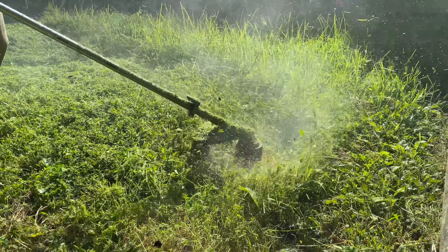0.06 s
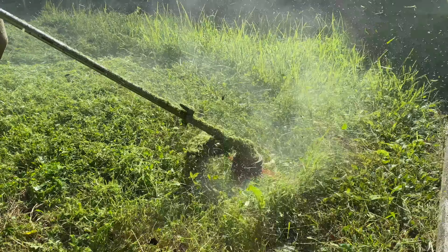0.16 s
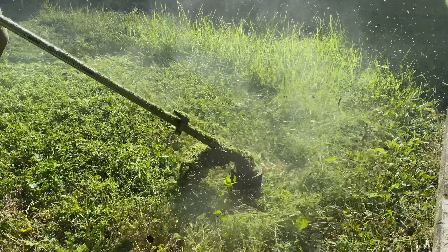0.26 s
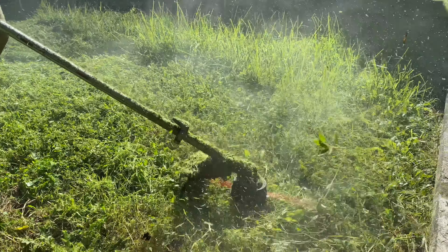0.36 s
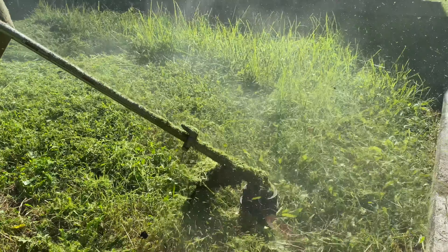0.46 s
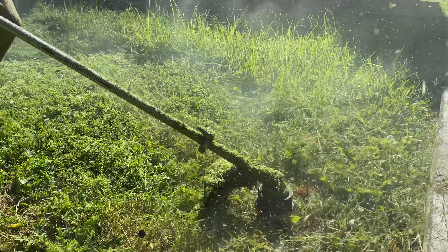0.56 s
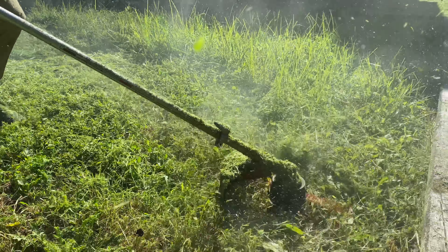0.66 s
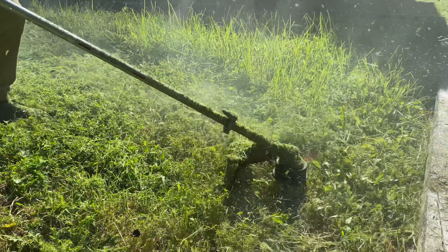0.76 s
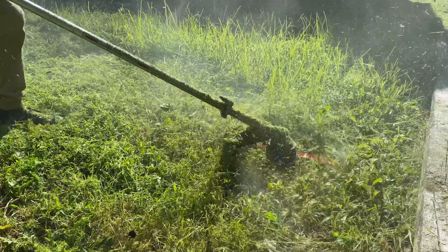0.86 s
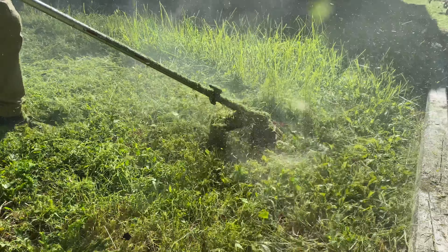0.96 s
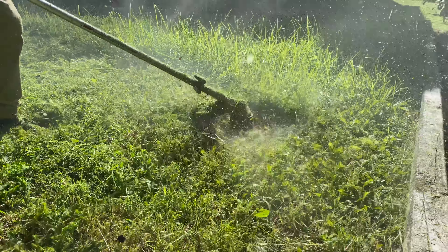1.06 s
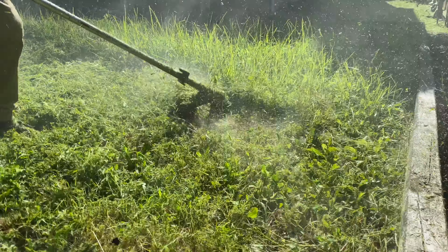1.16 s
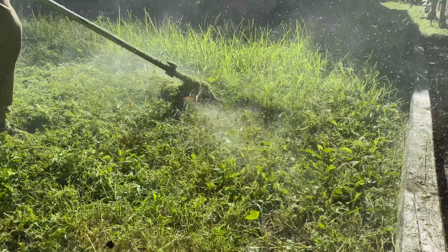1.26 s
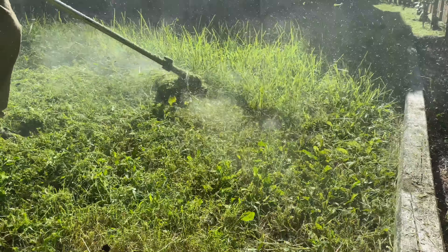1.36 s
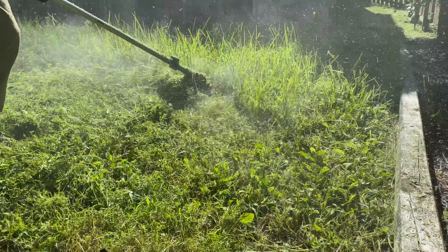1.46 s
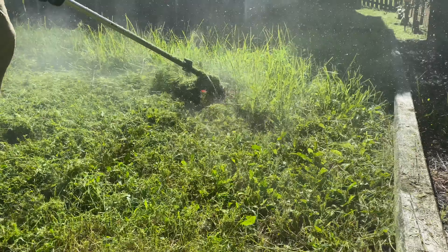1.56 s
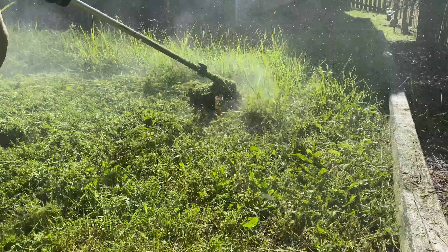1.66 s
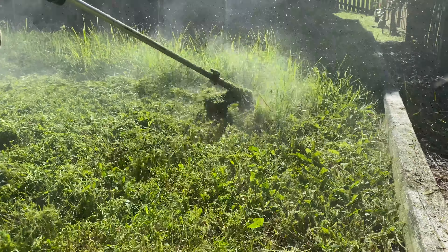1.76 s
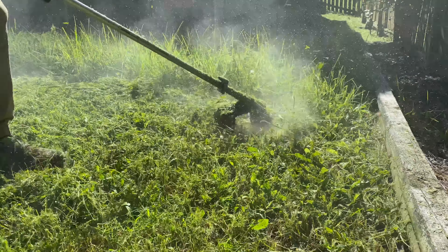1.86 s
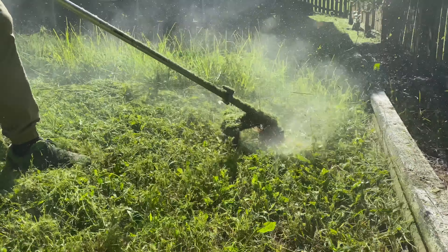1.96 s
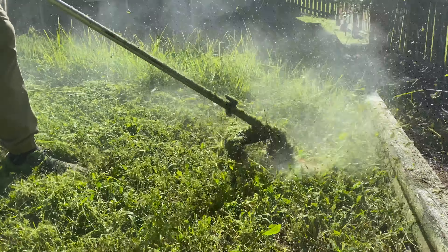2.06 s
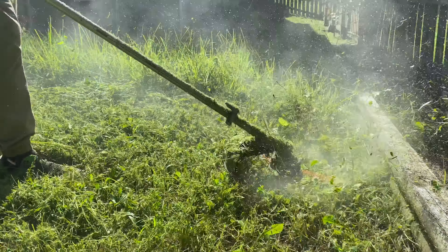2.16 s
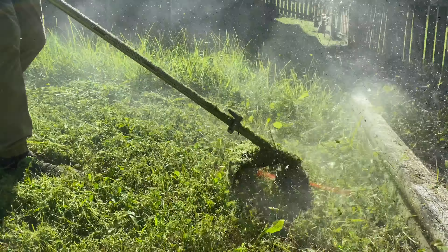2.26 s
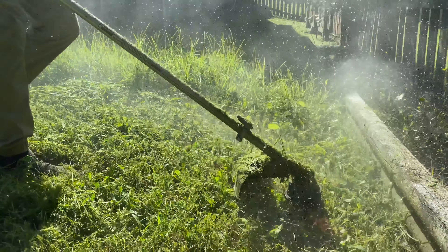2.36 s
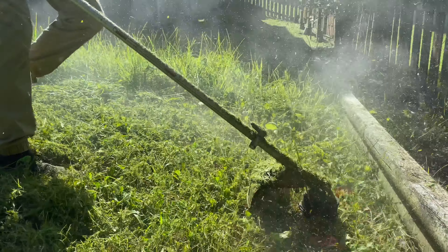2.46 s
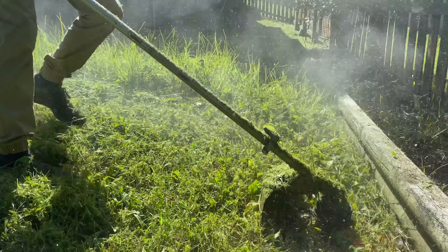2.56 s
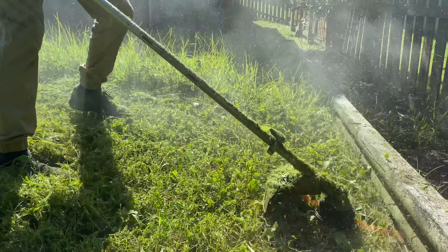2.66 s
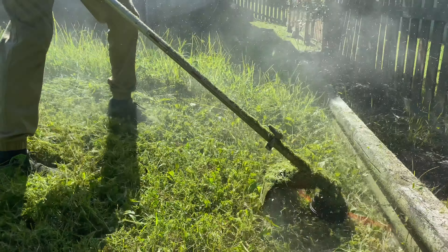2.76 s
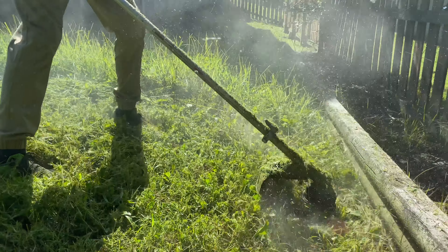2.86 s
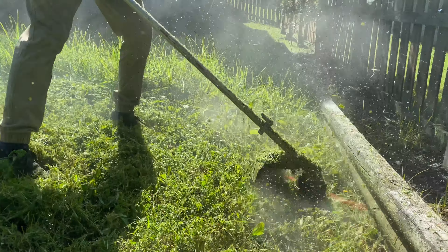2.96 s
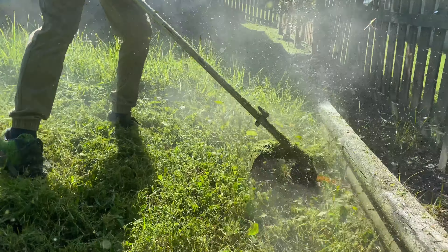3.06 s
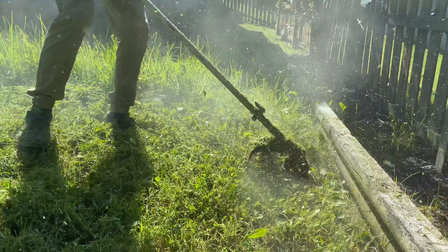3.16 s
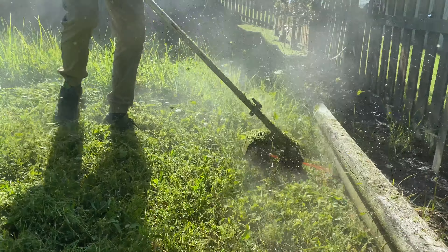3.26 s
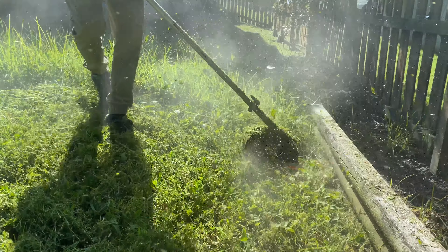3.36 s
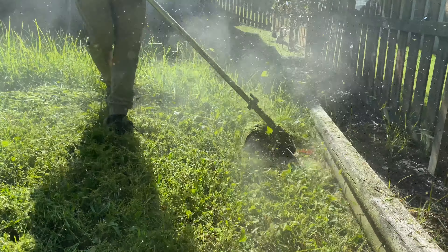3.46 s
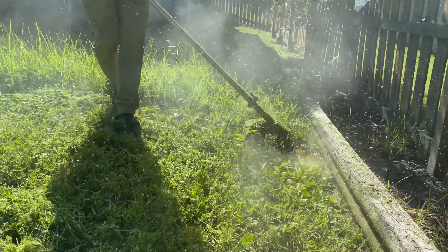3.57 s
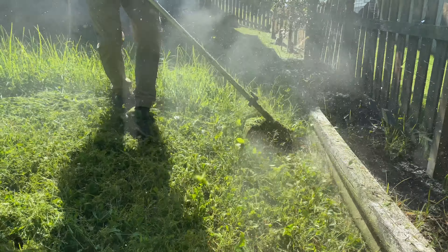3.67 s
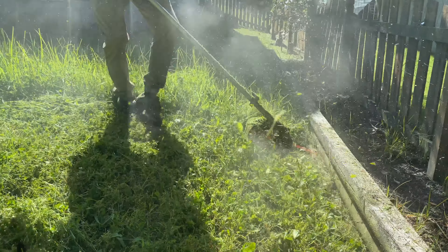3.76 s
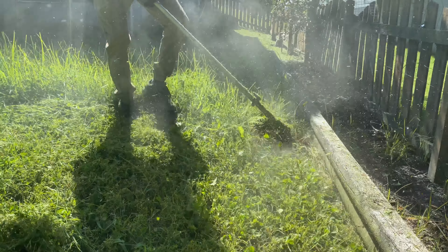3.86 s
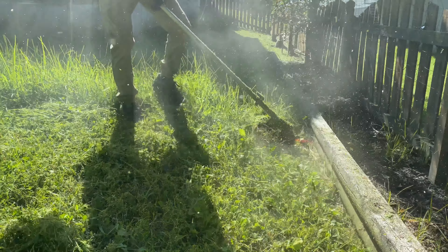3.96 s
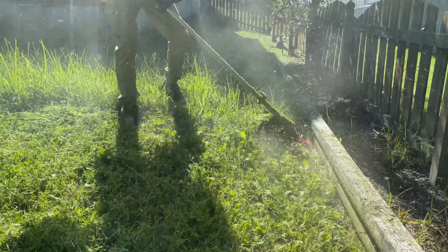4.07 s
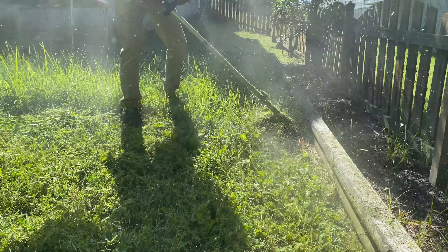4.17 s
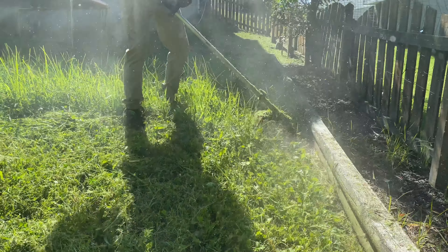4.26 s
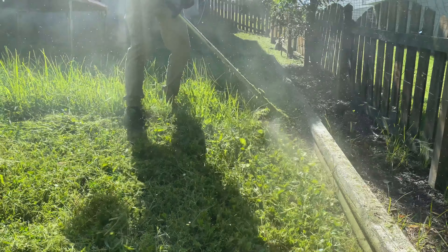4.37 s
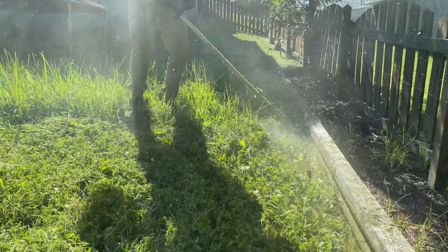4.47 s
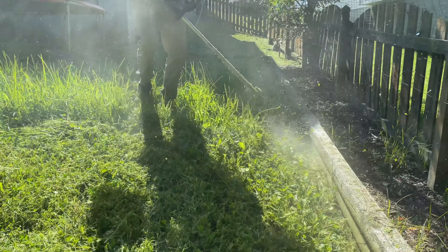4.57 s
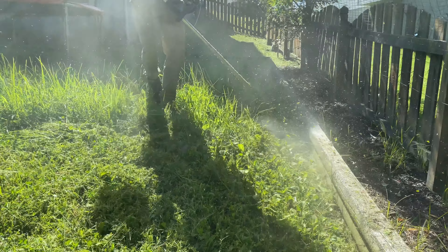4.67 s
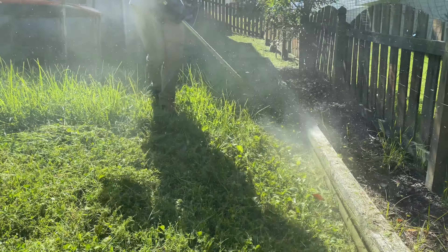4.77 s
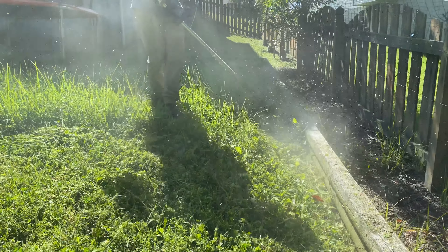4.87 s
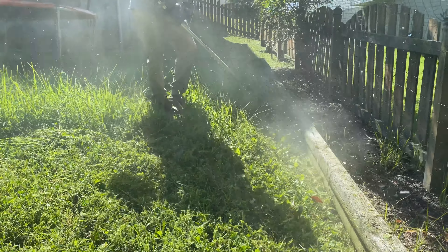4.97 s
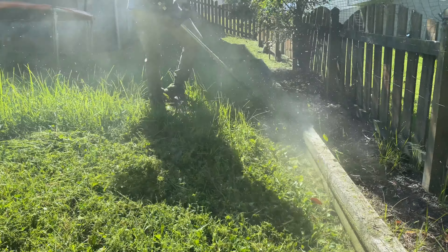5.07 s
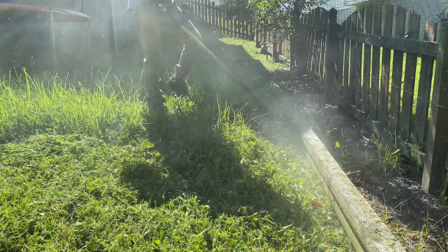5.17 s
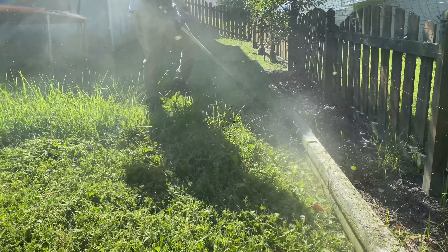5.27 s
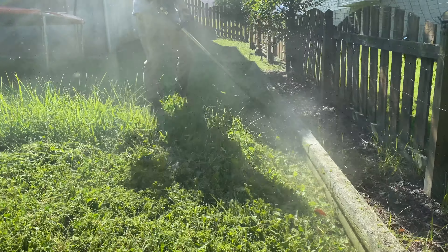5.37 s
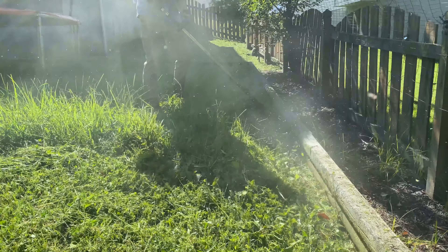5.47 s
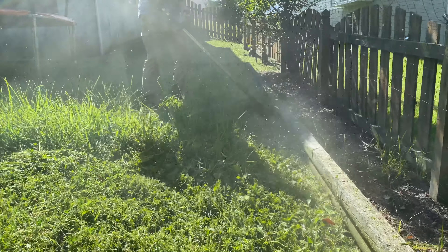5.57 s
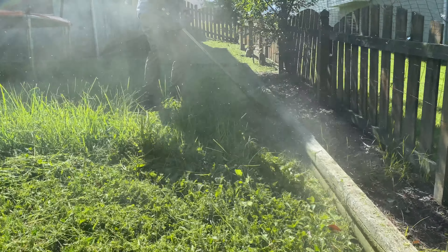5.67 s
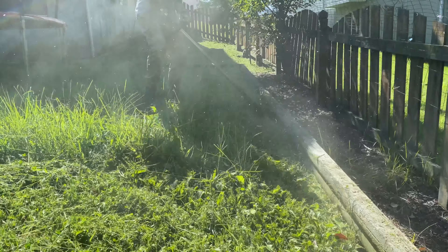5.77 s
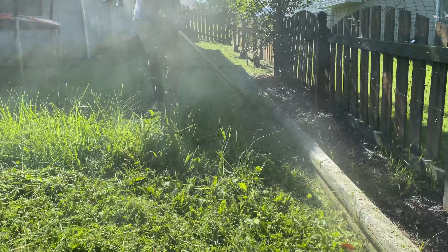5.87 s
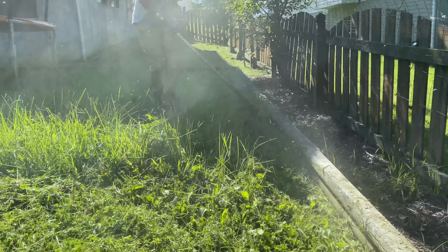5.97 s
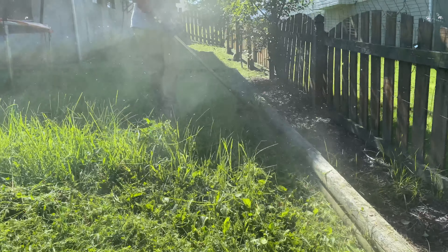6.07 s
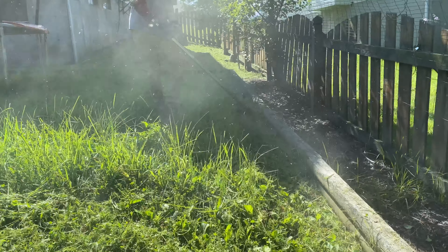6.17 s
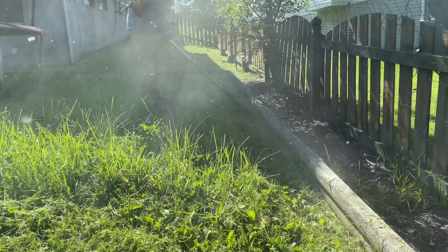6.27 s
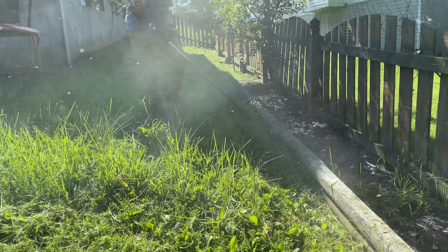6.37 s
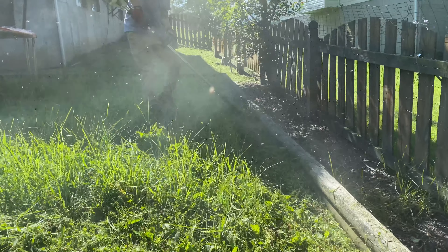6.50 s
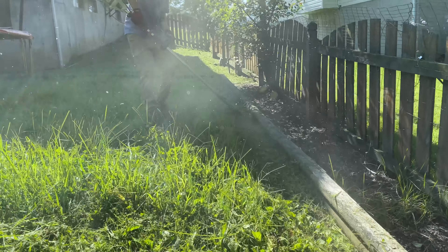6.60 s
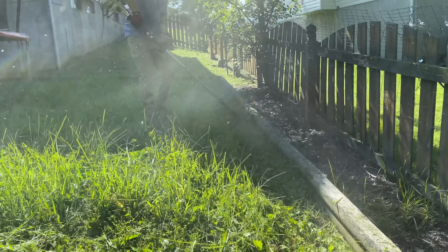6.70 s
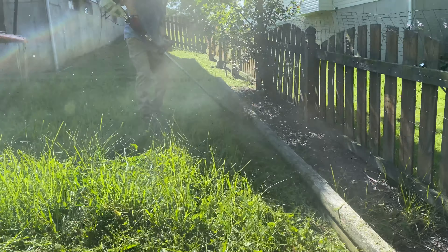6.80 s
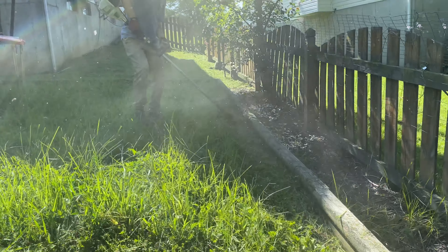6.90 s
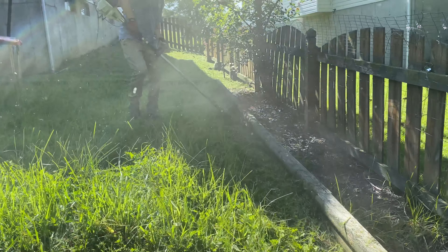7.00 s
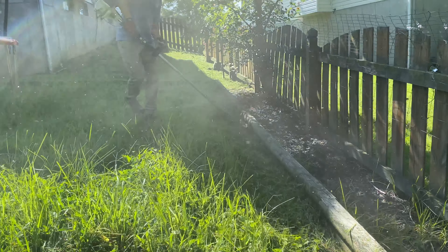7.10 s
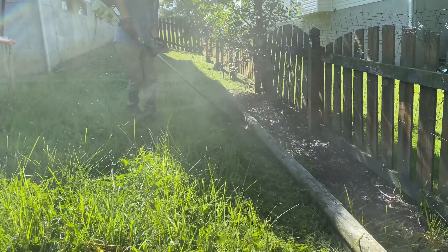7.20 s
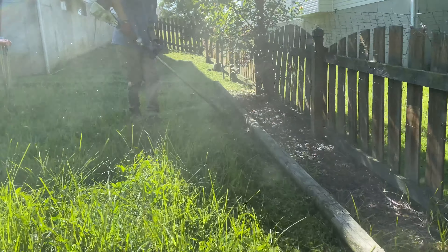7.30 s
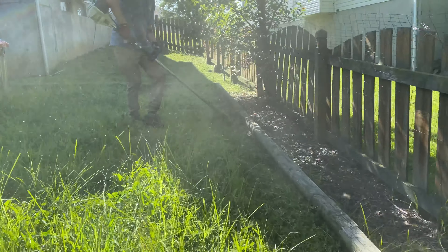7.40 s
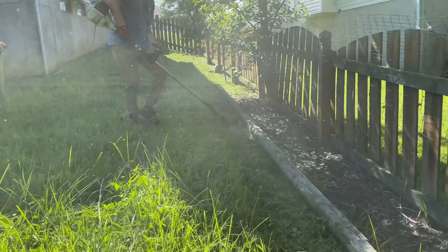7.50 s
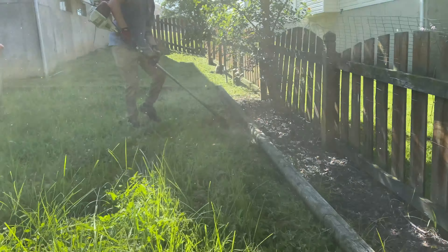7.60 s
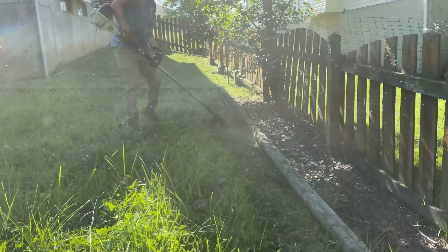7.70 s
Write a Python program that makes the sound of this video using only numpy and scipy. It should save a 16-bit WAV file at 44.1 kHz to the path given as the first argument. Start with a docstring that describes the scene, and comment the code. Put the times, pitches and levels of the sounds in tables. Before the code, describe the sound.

A small engine buzzes continuously at high revs, with a low drone around 75 hertz and a dense raspy buzz above. The spinning line whirs and tears tall grass in a fluttering, crackling hiss, with sharp twig cracks and a few dull thumps on the microphone early on. The revs dip before one and a half seconds, then recover. Cutting recedes along the yard, with a brief faint whistle late; a steady low hum lies underneath.

```python
"""In a yard, a petrol string trimmer runs near full throttle as its operator mows tall grass and walks away.
The exhaust drones as a stack of tones locked to the firings; the geared-down line whirs as tones locked to its turns.
Shredded stems and flung air are shaped noise, the casing clatters in a burst per firing, and twigs snap in brief cracks.
Debris knocks the microphone with falling tones, the line whistles once late on, and a steady hum lies underneath.
Two closely spaced microphone ports hear it all."""
import sys
import numpy as np
from scipy import signal
from scipy.fft import rfft, irfft
from scipy.io import wavfile
from scipy.ndimage import uniform_filter1d

SR = 44100
rng = np.random.default_rng(int(sys.argv[2]) if len(sys.argv) > 2 else 0)


def wrap_up_sound(samples):
    """Save the sound to the file named by the first command line argument, as 16-bit audio."""
    columns = np.atleast_2d(samples).T
    # keep every value between -1 and 1, then stretch to whole-number steps
    tamed = np.clip(columns, -1, 1)
    steps = np.round(tamed * 32767).astype(np.int16)
    wavfile.write(sys.argv[1], SR, steps)


N = 341334   # length in samples
TIME = np.arange(N) / SR   # s
BINS_HZ = np.maximum(np.arange(N // 2 + 1) * SR / N, 1)

# engine speed, with sags for thick grass: [t/s, firings per s]
ENGINE_SPEED = [(0.0, 72.6), (0.06, 72.3), (0.43, 76.1), (1.07, 75.1), (1.2, 73.6), (1.25, 71.9),
                (1.32, 70.8), (1.46, 70.0), (1.75, 74.5), (2.31, 73.4), (2.46, 76.1), (2.72, 78.2),
                (2.99, 74.3), (3.54, 75.8), (3.77, 75.0), (4.2, 76.3), (4.57, 74.5), (5.09, 75.5),
                (5.93, 73.8), (6.03, 75.2), (6.34, 76.2), (6.9, 74.5), (7.03, 73.0), (7.2, 75.8),
                (7.5, 77.2), (7.74, 76.2)]
# walking away: [t/s, place (0 near, 1 midway, 2 far)]
WALK = [(0, 0.0), (1.3, 0.27), (1.8, 0.2), (2.3, 0.78), (3.0, 1.08), (4.3, 1.2), (5.1, 1.65), (6.2, 1.73),
        (7.74, 2.0)]
# exhaust tones, before the trim and the changes below: [multiple of firing rate, level near/dB, midway/dB, far/dB]
EXHAUST_TONES = [(1, -38.8, -39.8, -40.2), (2, -36.5, -38, -34.6), (3, -52, -54, -53),
                 (4, -38.7, -40.5, -51.5), (5, -39.3, -42.7, -45.7), (6, -44.5, -44, -40),
                 (7, -46.5, -38.6, -42.7), (8, -42, -42.6, -40.3), (9, -48.5, -50.5, -46.3),
                 (10, -45, -52.5, -47.5), (11, -45, -45.7, -51), (12, -61, -60, -58), (13, -51, -43, -52),
                 (14, -54, -51.5, -52.5), (15, -59, -60, -57), (16, -57, -57, -51.5), (17, -59, -62, -56),
                 (23, -62, -61, -60), (28, -60, -61, -63), (33, -57, -58, -54), (35, -61, -62, -61),
                 (38, -56, -55, -56), (42, -58, -61, -62), (47, -59, -62, -65)]
# change in the exhaust's upper tones as the operator turns: [t/s, level/dB]
BARK = [(0, -1.5), (0.8, 1.5), (1.1, 1.5), (1.35, -1), (1.75, 2.5), (2.2, -0.5), (2.45, -1), (2.8, 0),
        (3.4, 0.5), (5.2, 0.5), (5.9, -0.5), (6.35, 0.5), (7.05, -0.5), (7.3, 1), (7.74, 2)]
# exhaust at the two ports: [f/Hz, left minus right level/dB]
EXHAUST_PAN = [(150, 0), (300, .8), (550, 3.3), (900, 5.5), (1500, 7), (2000, -2), (2500, -2), (2900, 2),
               (4500, 0)]
# tones of the two strands, relative to WHIR_LEVEL: [multiple of head turns, level near/dB, level from midway on/dB]
WHIR_TONES = [(2, -1.5, -2), (4, -7, -12), (6, -15.5, -13), (8, -22, -16)]
# whir of the free-running line, loudest as the head swings close: [t/s, level/dB]
WHIR_LEVEL = [(0, -33.5), (1.3, -35.5), (2.2, -31.5), (2.9, -35), (4.3, -38), (7.74, -39)]
# steady hum: [multiple of HUM_HZ, level/dB]
HUM_TONES = [(2, -41.5), (3, -48), (4, -50.5), (5, -42.5), (6, -48), (8, -53.5)]
# tone of the engine casing: [f/Hz, relative level per Hz near/dB, relative level per Hz far/dB]
CASING_COLOUR = [(700, -8, -8), (1200, -13, -11.5), (1800, -15, -14), (2250, -3, -6), (2480, 1, 5.5),
                 (2660, -3, -4), (2850, 0, 5.5), (3080, -1, -3), (3500, 3, -5), (3900, 3, -6),
                 (4600, 1.5, 3.5), (5400, 1.5, 4.5), (7000, -1, -1), (15000, -24, -24)]
# clatter of the casing, plainest when the engine faces the microphone: [t/s, level/dB]
CLATTER = [(0, -39), (0.95, -38.5), (1.3, -38.5), (1.7, -33.5), (2.1, -36), (2.5, -51), (3.3, -39.5),
           (4.2, -42.5), (4.6, -43), (5.3, -39.5), (5.55, -48), (6.1, -46), (6.3, -40.5), (6.9, -43),
           (7.1, -42), (7.5, -42.5), (7.74, -36)]
# the cut, which shredding and clipped blades follow at offsets of their own: [t/s, level/dB]
CUT = [(0.0, -30.5), (0.43, -25.5), (0.73, -24), (1.33, -36), (2.55, -26.5), (2.72, -26.5), (4.22, -35),
       (4.72, -35), (6.21, -37.5), (6.62, -34.5), (6.77, -36.5), (6.94, -32.5), (7.09, -36), (7.74, -32)]
# tone of the shredding: [f/Hz, relative level per Hz/dB]
SHRED_COLOUR = [(1000, -29), (2700, -21), (4000, -6), (5500, -1.5), (6700, 2), (7500, 3.5), (9500, 2.5),
                (12000, 0), (14000, 0.5), (15800, -4)]
# tearing of thick stems, which eases where the line only skims the tips: [t/s, level/dB]
TEARING = [(0, -31), (0.42, -32), (0.55, -32.5), (0.75, -29.5), (1.0, -32.5), (1.35, -36), (1.55, -37),
           (1.9, -33), (2.2, -31.5), (2.5, -33), (2.65, -33), (2.8, -30.5), (3.0, -30), (3.35, -34),
           (4.2, -36.3), (4.7, -33.5), (5.3, -35.5), (5.55, -36), (6.1, -35.5), (6.45, -34.5), (7.1, -37.5),
           (7.74, -35)]
# tone of the tearing: [f/Hz, relative level per Hz/dB]
TEAR_COLOUR = [(300, -20), (900, -7), (1400, -4.2), (2000, -.9), (3000, -1.6), (5000, -1.8), (7000, -3),
               (15000, -14)]
# tone of the flung air and clippings: [f/Hz, relative level per Hz/dB]
RUSH_COLOUR = [(20, -34), (40, -31), (70, -2), (120, 3), (200, 3.5), (400, 6), (650, 3), (950, 3.5),
               (1500, -5), (3000, -58)]
# the rush at the two ports: [f/Hz, left minus right level/dB]
RUSH_PAN = [(150, 0), (350, 1), (700, 3), (1400, 4), (2500, 3)]
# tone of single clipped blades: [f/Hz, relative level per Hz/dB]
BLADE_COLOUR = [(3000, -28), (6000, -14), (9500, -11), (11000, 0), (12500, 4), (14000, 1), (15800, -10)]
# snapping twigs and thick stems: [t/s, energy before the trim in scene()/dB, lowest f/Hz, highest f/Hz]
SNAPS = [(0.031, -6, 1500, 6000), (0.0565, -6, 1000, 5000), (0.0687, -2, 10000, 15000),
         (0.0767, -2, 600, 7000), (0.1135, -6, 1000, 5000), (0.1418, -2, 10000, 15000),
         (0.185, -1, 2500, 7000), (0.1943, 2, 3200, 5600), (0.3013, -1, 10000, 15000),
         (0.333, -2, 10000, 15000), (0.4252, 3.5, 800, 9000), (0.4502, 6, 11500, 14500),
         (0.5058, 1, 11000, 15000), (0.5798, 1, 10000, 14000), (0.5886, 1, 11000, 14000),
         (0.6626, 2, 10500, 14000), (0.7742, 0, 10000, 15000), (0.818, 0, 2000, 7000),
         (0.9456, -2, 3000, 9000), (1.0842, -6, 2000, 7000), (1.184, -2, 2200, 7500),
         (1.6265, -2, 3000, 7000), (1.862, -5, 2000, 7000), (1.9292, -6, 2500, 7000),
         (2.0088, -2, 10000, 15000), (2.044, -6, 2500, 7000), (2.2216, -3, 3000, 10000),
         (2.227, -5, 3000, 7000), (2.3659, 1, 10000, 15000), (2.6761, 0, 10000, 15000),
         (2.7683, -2, 2000, 15000), (2.8002, 7, 500, 15000), (2.9611, 2, 5000, 15000),
         (2.963, -4, 1200, 5000), (3.0502, 2, 4000, 15000), (3.2602, -2, 3000, 12000),
         (3.5512, -5, 3000, 14000), (3.8485, -4, 10000, 15000), (4.7845, -7, 3000, 13000),
         (5.3765, -5, 2500, 8000), (5.785, -7, 3000, 14000), (5.867, -8, 10000, 15000),
         (6.618, -8, 2500, 7000), (6.9374, -4, 9000, 15000), (7.0057, -5, 10000, 15000),
         (7.3834, -7, 10000, 15000), (7.509, -2, 3500, 15000)]
# debris and puffs on the microphone: [t/s, starting level of the knock/dB, first f/Hz, last f/Hz, decay/s]
THUMPS = [(0.0768, -14.5, 820, 75, 0.012), (0.112, -24, 400, 90, 0.005), (0.425, -28, 100, 45, 0.03),
          (0.88, -31, 140, 60, 0.03), (2.807, -17, 170, 65, 0.018), (2.95, -33, 90, 45, 0.04),
          (3.351, -32, 90, 50, 0.025)]
# the line bites into a thick tuft: [t/s, tearing level at its height/dB, half length/s]
TUFTS = [(0.195, -31, .03), (0.42, -31, .04), (0.75, -32, .025), (0.815, -33, .025), (0.945, -34, .025),
         (1.185, -33, .025), (1.63, -37, .03), (1.87, -34, .05), (2.225, -37, .025), (2.8, -32, .025),
         (2.96, -32, .035), (3.045, -35, .025), (4.48, -34.5, .05), (4.78, -38, .03), (5.37, -39, .03),
         (5.79, -39, .03), (6.32, -37, .04), (6.6, -38, .04)]
# noise at the two ports: [f/Hz, likeness of left and right (0 to 1)]
LIKENESS = [(100, 1), (350, .95), (700, .75), (1400, .25), (2700, .25), (3600, .55), (5000, .75),
            (6800, .85), (7400, 1), (8800, 1), (9300, .82), (11400, .85), (11900, .995), (13600, .995),
            (14300, .78), (16000, .65)]
# the ports hear opposite phases around 8 kHz: [f/Hz, lead of left over right/radians]
LEAD = [(100, 0), (1200, .3), (2200, -.6), (3300, -1.3), (4800, -.2), (5900, -1.5), (6900, -2.45),
        (7400, -3.12), (8800, -3.16), (9200, -3.9), (11400, -5.5), (11900, -6.25), (13600, -6.3),
        (14200, -7.1), (16000, -8.5)]

FLUTTER, FLUTTER_PER_S = 0.1825, 11.46   # small unsteadiness: spread in firings per s; changes per s
UNEVEN_FIRING = .14   # spread of the exhaust's strength, as a share
EXHAUST_DB = -0.5
SHIMMER_DB, SHIMMER_PER_S = 1.1, 11   # spread for the sixth tone and above; changes per s
GEAR_RATIO = 1.4   # engine turns per head turn
SETTLE_S = 1.7   # a sag is taken against the mean speed over this time
WHIR_SAG_DB_PER_HZ = 2.5   # the whir fades when grass drags on the line
HUM_HZ = 29.1
KNOCK_DEPTH = 1.2   # casing throb per firing
GROUND_ECHO, GROUND_SWING = .24, .06   # echo gain; spread of its delay on a log scale
STROKE_DEPTH, STROKE_DEPTH_PER_DB = 0.16, 0.0146   # strand beat at the mean cut; growth with the cut
OVERTONE_SHARE, LONG_STRAND_SHARE = 0.42, 0.3   # shares of that depth at double and half the rate
SHRED_DB, BLADES_DB = 4, -8   # relative to the cut
# the rush: level near at mean tearing, share of the tearing's swing, rise per place
RUSH_DB, RUSH_FOLLOWS, RUSH_RISE_DB = -40, 0.67, 0.54
PUFFING = .32   # throb of the rush per firing
TUFT_RUSH_DB = -7.5   # gust of a bite relative to its tearing
CUTOFF_HZ = 15780


def from_db(db):
    """Turn decibels into gain."""
    return 10 ** (np.asarray(db) / 20)


def rms_one(x):
    """Scale to unit power."""
    return x / np.sqrt(np.mean(x ** 2) + 1e-20)


def in_time(rows):
    """Draw one curve over time for each column after the first."""
    s, *columns = np.transpose(rows)
    return [np.interp(TIME, s, column) for column in columns]


def at_hz(points, hz):
    """Read a table between its points on a log-frequency axis."""
    f, value = np.transpose(points)
    return np.interp(np.log(hz), np.log(f), value)


def drift(rate):
    """Wander at random with spread 1, changing about rate times a second."""
    pole = np.exp(-200 * np.pi * rate / SR)   # one step is 100 samples
    steps = rng.standard_normal(N // 100 + 1002)
    slow = signal.lfilter([1], [1, -2 * pole, pole * pole], steps)[1000:]
    return np.interp(np.arange(N) / 100, np.arange(len(slow)), rms_one(slow))


def at_ports(pair, colour):
    """Colour two unrelated signals and mix them into left and right, partly alike and shifted in phase; rms 1."""
    common, apart = rfft(pair) * from_db(at_hz(colour, BINS_HZ))
    alike = np.clip(at_hz(LIKENESS, BINS_HZ), 0, 1)
    sides = np.array([[1], [-1]])
    mixed = np.sqrt(1 + alike) * common + np.sqrt(1 - alike) * apart * sides
    shift = np.exp(.5j * sides * at_hz(LEAD, BINS_HZ))
    return rms_one(irfft(mixed * shift, N))


def noise_pair():
    """Make two unrelated hisses."""
    return rng.standard_normal((2, N))


def panned(x, pan):
    """Tilt left against right, frequency by frequency."""
    tilt_db = at_hz(pan, BINS_HZ) * np.array([[.5], [-.5]])
    return irfft(rfft(x) * from_db(tilt_db), N)


def throb(cycles, depth):
    """Make a gain that swells once a cycle, at unit power."""
    return rms_one(np.exp(depth * np.cos(2 * np.pi * cycles)))


def exhaust(firings, firing_hz, place, wander_db, uneven, ring, smear, lead_s, rasp_db, count=48):
    """Add the tones of the firing pulse; each fades and returns as the muffler swings above the ground."""
    order, *levels = np.transpose(EXHAUST_TONES)
    turn = (2 * np.pi * (firings % 1)).astype(np.float32)
    out = np.zeros((2, N), np.float32)
    bark_db, = in_time(BARK)
    for k in range(1, count + 1):
        height = min(k / 20, 1)   # high tones are the most directional
        place_levels = [np.interp(k, order, db) for db in levels]
        level_db = np.interp(place, np.arange(3), place_levels) + min(k / 8, 1) * bark_db
        shimmer_db = SHIMMER_DB * min(k / 6, 1) * drift(SHIMMER_PER_S)
        rove_db = wander_db * min(k / 14, 1) * drift(0.81)
        gain = from_db((level_db + shimmer_db + height * rasp_db + rove_db).astype(np.float32))
        tilt_db = at_hz(EXHAUST_PAN, k * firing_hz) * np.array([.5, -.5])
        pan = np.sqrt(2) * rms_one(from_db(tilt_db))
        # the muffler rings longest in the bass, and echoes smear the pulse
        scatter = (smear * np.sqrt(k) + 2 * (k < 6)) * rng.standard_normal()
        angle = k * turn + np.float32(-ring * np.log(k) + scatter)
        lead = 2 * np.pi * k * firing_hz * lead_s * min(k / 3, 1) + height ** 2 * rng.standard_normal()
        out[0] += pan[0] * gain * np.cos(angle + np.float32(lead))
        out[1] += pan[1] * gain * np.cos(angle)
    return out * (1 + uneven * drift(51))   # strength varies quickly, as firings are unequal


def sag(speed):
    """Find how far the engine falls below its mean speed around that moment, in firings per s."""
    usual = uniform_filter1d(speed, int(SETTLE_S * SR), mode="nearest")
    return np.maximum(usual - speed, 0)


def whir(turns, place, wander_db):
    """Two strands sweep the air twice a turn and bend unevenly as they drag through the grass."""
    far = np.minimum(place, 1)
    out = 0
    for k, near_db, far_db in WHIR_TONES:
        level_db = near_db + (far_db - near_db) * far + wander_db * np.sqrt(k / 2) * drift(5.0)
        out = out + np.sqrt(2) * from_db(level_db) * np.sin(2 * np.pi * k * turns)
    return out


def hum():
    """Add steady low tones of some other machine; one lies close enough to the trimmer's drone to beat with it."""
    return sum(np.sqrt(2) * from_db(db) * np.sin(2 * np.pi * (round(k) * HUM_HZ * TIME + rng.random()))
               for k, db in HUM_TONES)


def casing(firings, place):
    """Valve gear and piston rattle in one burst per firing; the tone turns hollower with distance."""
    clatter_db = in_time(CLATTER)[0] + 1.4 * drift(40)
    knocks = throb(firings, KNOCK_DEPTH) * throb(2 * firings, depth=0.075) * from_db(clatter_db)
    near, far = (at_ports(noise_pair(), np.array(CASING_COLOUR)[:, [0, k]]) for k in (1, 2))
    away = np.clip(place / WALK[-1][1], 0, 1)
    return knocks * (np.sqrt(1 - away) * near + np.sqrt(away) * far)


def grains(per_s, spread_db, smooth):
    """Scatter tiny fractures of uneven size over a smooth hiss, twice over."""
    sizes = from_db(spread_db * np.minimum(rng.exponential(1, (2, N)), 5))
    signed = sizes * rng.choice([-1, 1], (2, N))
    fractures = signed * (rng.random((2, N)) < per_s / SR)
    return rms_one(fractures) + smooth * noise_pair()


def strikes(turns, swing_db):
    """Strands hit stems as they come round, one strand harder; the deeper the cut, the stronger the beat."""
    depth = np.clip(STROKE_DEPTH + STROKE_DEPTH_PER_DB * swing_db, 0, 1)
    both = throb(2 * turns, depth)
    return both * throb(4 * turns, depth * OVERTONE_SHARE) * throb(turns, depth * LONG_STRAND_SHARE)


def shred(firings, strokes, cut_db):
    """Stems break in many tiny fractures that beat with the strands and, faintly, with the firings."""
    fibres = grains(per_s=4500, spread_db=1.0, smooth=0.88) * strokes * throb(firings, depth=0.031)
    return from_db(cut_db + SHRED_DB + 1.0 * drift(21)) * at_ports(fibres, SHRED_COLOUR)


def slaps(turns, spread_db, size=4096):
    """Each pass of a strand meets more or less grass than the last; a gain."""
    passes = np.interp(2 * turns, np.arange(size), rng.standard_normal(size))
    return rms_one(from_db(spread_db * passes))


def tear(firings, turns, strokes, tear_db, bites):
    """Thick stems tear in coarser, more uneven fractures, stronger or weaker from pass to pass."""
    fibres = at_ports(grains(per_s=3500, spread_db=3.5, smooth=0.85) * strokes, TEAR_COLOUR)
    gain = np.hypot(from_db(tear_db), bites) * from_db(1.04 * drift(23))
    return gain * slaps(turns, spread_db=1.36) * throb(firings, depth=0.051) * fibres


def off_the_ground(x, place, echo, delay_s, swing):
    """A ground echo cuts hollows into the hiss; they slide as the trimmer swings and moves away."""
    late = np.arange(N) - SR * delay_s * np.exp(swing * drift(.5)) / (1 + 0.28 * place)
    source = np.clip(late, 0, N - 1).astype(int)
    return (x + echo * np.array([side[source] for side in x])) / np.sqrt(1 + echo ** 2)


def rush(firings, place, tear_db, bites):
    """The head flings air and clippings in a low hiss that follows the tearing and puffs with the firings."""
    follow_db = RUSH_FOLLOWS * (tear_db - tear_db.mean())
    steady = from_db(RUSH_DB + follow_db + RUSH_RISE_DB * place + 2.0 * drift(8.1))
    gusts = np.hypot(steady, from_db(TUFT_RUSH_DB) * bites)
    air = at_ports(noise_pair() * throb(firings, depth=PUFFING), RUSH_COLOUR)
    return gusts * panned(air, RUSH_PAN)


def blades(cut_db, per_s, decay_s):
    """Single blades of grass part with short bright bursts at random moments."""
    starts = (rng.random(N) < per_s / SR) * rng.uniform(.3, 1, N)
    bursts = signal.lfilter([1], [1, -np.exp(-1 / (decay_s * SR))], starts + 1e-18)
    return from_db(cut_db + BLADES_DB) * at_ports(noise_pair() * bursts, BLADE_COLOUR)


def snaps(decay_s, splinter, colour, size=400):
    """Each break is one sharp crack and a brief splintering, in a band of its own."""
    out = np.zeros((2, N + size))
    for s, db, low_hz, high_hz in SNAPS:
        fading = rng.standard_normal((2, size)) * np.exp(-TIME[:size] / decay_s)
        burst = splinter * rms_one(fading) / np.sqrt(size)
        burst[0, 0] = 1   # the sharp crack
        band = signal.butter(2, [low_hz, high_hz], "band", fs=SR, output="sos")
        crack = signal.sosfilt(band, burst)
        at = int(s * SR)
        out[:, at:at + size] += from_db(db) * rms_one(crack) / np.sqrt(size)
    return at_ports(out[:, :N], colour) * np.sqrt(np.mean(out ** 2))


def thumps(glide_s, rough, eddy_hz, size=8000):
    """A knock on the microphone rings in a tone that falls ever lower as it dies; the stirred air flutters on
    twice as long."""
    out, t = np.zeros(N + size), TIME[:size]
    band = signal.butter(2, [35, eddy_hz], "band", fs=SR, output="sos")
    for s, db, first_hz, last_hz, decay in THUMPS:
        hz = last_hz + (first_hz - last_hz) * np.exp(-t / glide_s)
        knock = np.sin(2 * np.pi * np.cumsum(hz) / SR) * np.exp(-t / decay)
        eddies = rms_one(signal.sosfilt(band, rng.standard_normal(size)))
        at = int(s * SR)
        out[at:at + size] += from_db(db) * (knock + rough * eddies * np.exp(-t / (2 * decay)))
    return out[:N]


def tufts():
    """Each bite swells and dies within a few strokes of the line; a gain."""
    return sum(from_db(db) * np.exp(-((TIME - s) / half_s) ** 2) for s, db, half_s in TUFTS)


def whistle(turns, s, half_s, db, order=8):
    """For a moment the line skims the ground and sings on a high multiple of its turning rate."""
    swell = np.exp(-((TIME - s) / half_s) ** 4)
    return np.sqrt(2) * from_db(db + 1.6 * drift(22)) * swell * np.cos(2 * np.pi * order * turns)


def scene():
    """One crankshaft times the exhaust, casing and cutting head; the rush follows the tearing."""
    (speed,), (place,), (cut_db,), (tear_db,) = map(in_time, (ENGINE_SPEED, WALK, CUT, TEARING))
    bites = tufts()
    firings = np.cumsum(speed + FLUTTER * drift(FLUTTER_PER_S)) / SR
    crank = 2 * firings   # four-stroke: two revolutions to a firing
    turns = crank / GEAR_RATIO
    strokes = strikes(turns, cut_db - cut_db.mean())

    engine = from_db(EXHAUST_DB) * exhaust(
        firings, np.mean(speed), place, wander_db=2.5, uneven=UNEVEN_FIRING,
        ring=6.014, smear=0.26, lead_s=0.00027, rasp_db=3.0)
    line_db = in_time(WHIR_LEVEL)[0] - WHIR_SAG_DB_PER_HZ * sag(speed)
    line = from_db(line_db) * whir(turns, place, wander_db=1.32)
    rattle_and_tear = casing(firings, place) + tear(firings, turns, strokes, tear_db, bites)
    hiss = off_the_ground(rattle_and_tear, place, GROUND_ECHO, delay_s=0.001145, swing=GROUND_SWING)
    grass = shred(firings, strokes, cut_db) + blades(cut_db, per_s=70, decay_s=.0007)
    air = rush(firings, place, tear_db, bites)
    twigs = from_db(-1.5) * snaps(decay_s=.0008, splinter=1.0, colour=[(300, 0), (13000, 0), (16000, -4)])
    debris = thumps(glide_s=0.0036, rough=.17, eddy_hz=330)
    singing = whistle(turns, s=6.35, half_s=.17, db=-44)
    return engine + line + hum() + hiss + grass + air + twigs + debris + singing


def record(dry):
    """Round the sharpest peaks and cut the top steeply."""
    rounded = .9 * np.tanh(dry / .9)
    return irfft(rfft(rounded) / np.sqrt(1 + (BINS_HZ / CUTOFF_HZ) ** 400), N)


dry = scene()
out = record(dry)
wrap_up_sound(out)
```